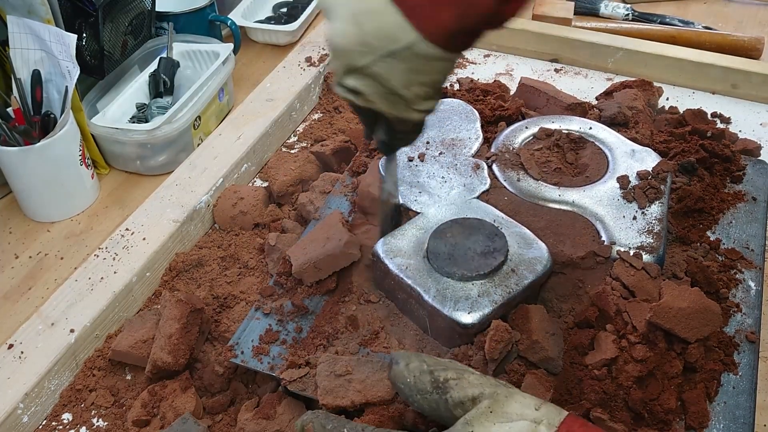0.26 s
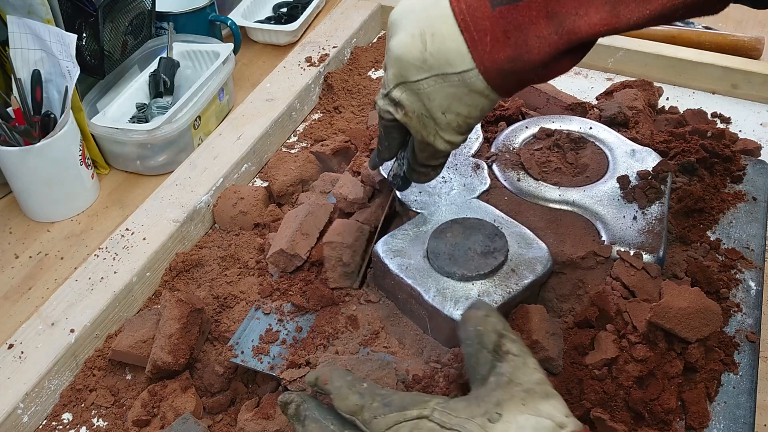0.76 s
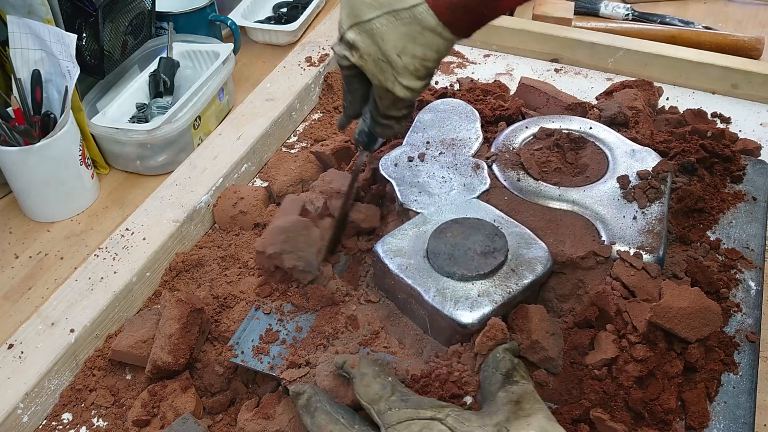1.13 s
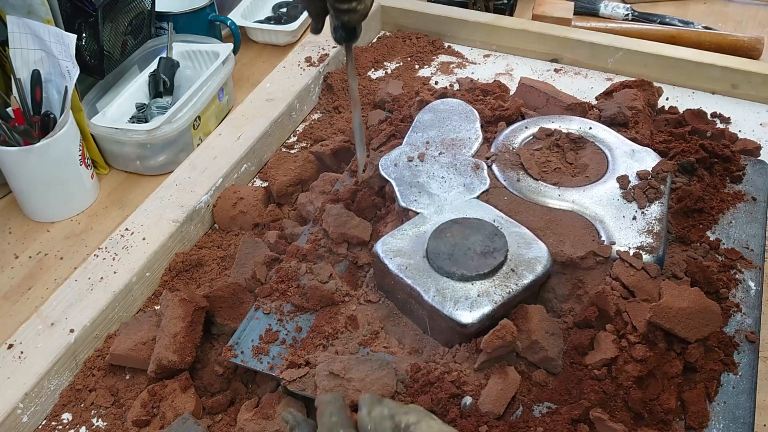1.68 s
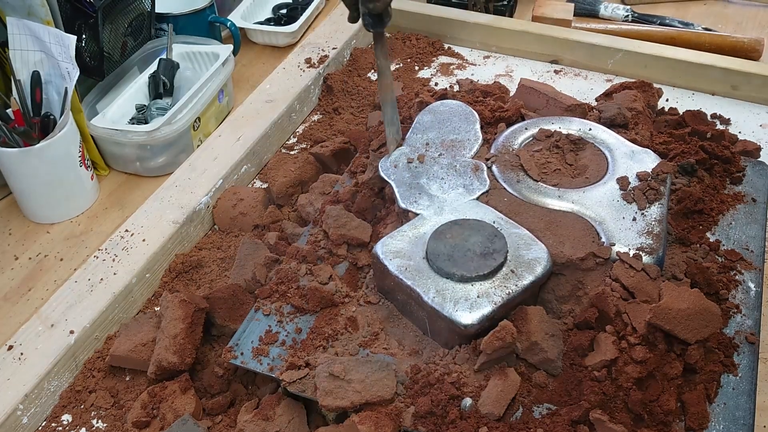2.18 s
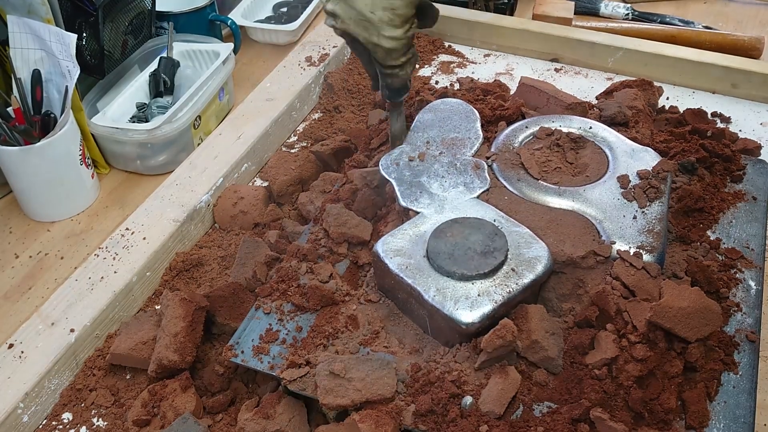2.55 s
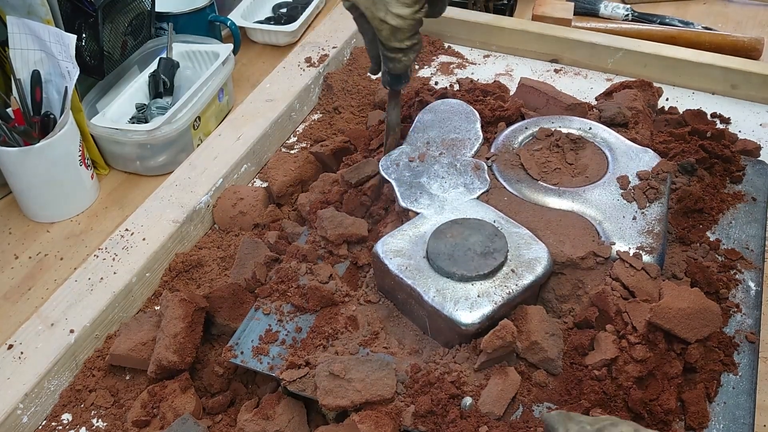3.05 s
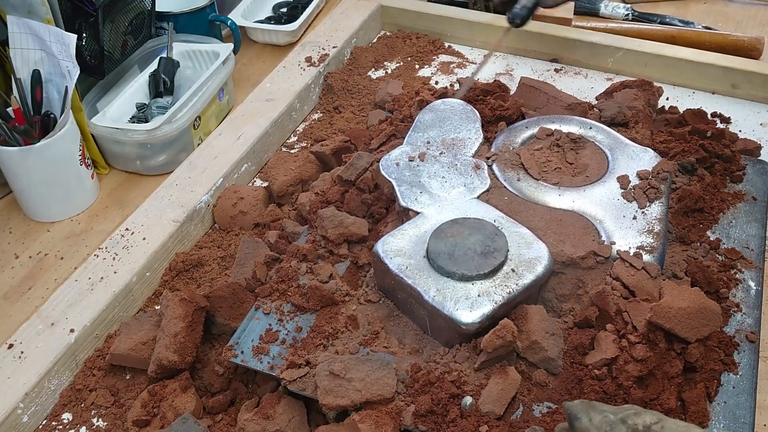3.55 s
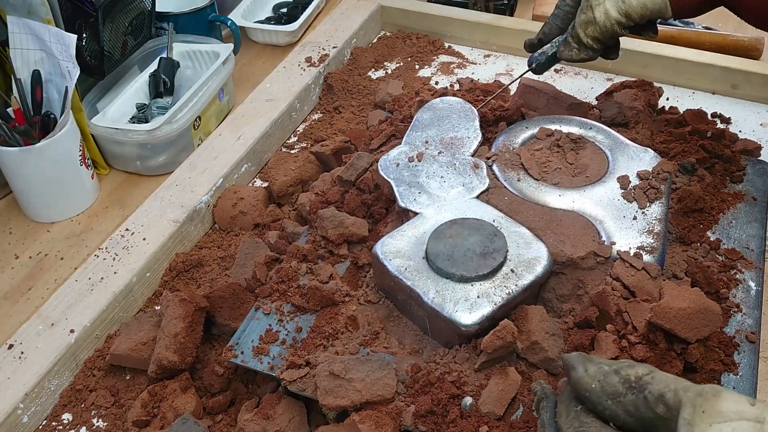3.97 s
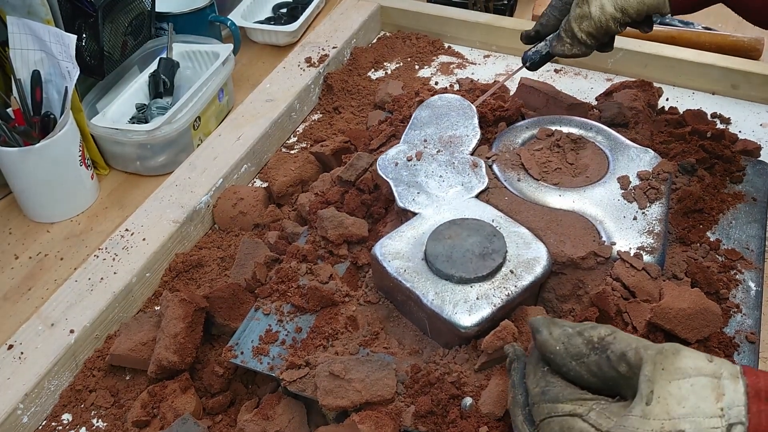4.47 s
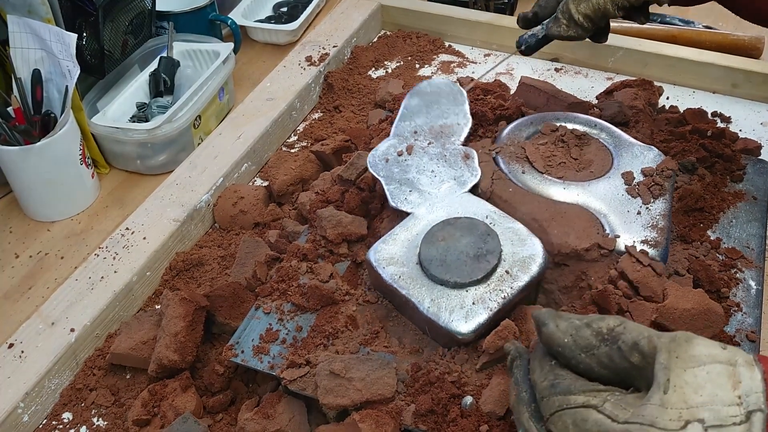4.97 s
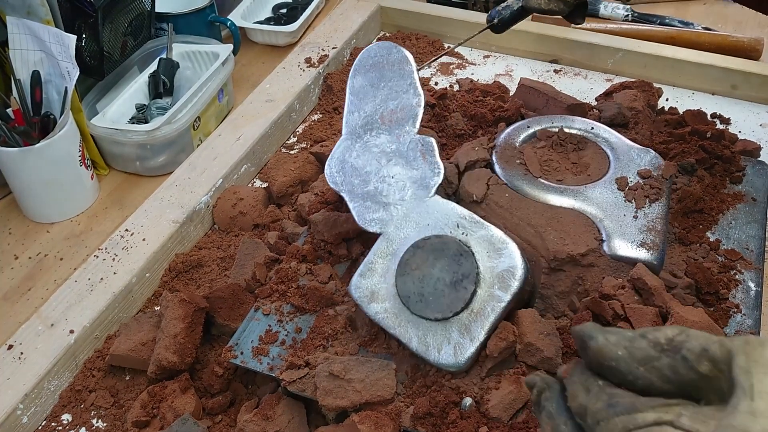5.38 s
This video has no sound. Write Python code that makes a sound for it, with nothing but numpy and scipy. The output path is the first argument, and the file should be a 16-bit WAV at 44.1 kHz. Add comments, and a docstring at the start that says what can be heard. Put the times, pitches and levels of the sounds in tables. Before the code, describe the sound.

Gritty digging in dry moulding sand with sharp metallic clinks, one brief high squeal and dull clod thumps, close up over a faint indoor hum.

```python
"""A steel blade digs through packed sand around metal castings in a wooden frame, in a quiet workshop.
Bursts of sand grains make the scrapes and drive decaying metal modes; noise cracks start the clinks.
One sagging sine squeals, then the freed blade rings. Clods are falling sine thumps with puffs of noise;
creaks and whistles are gliding sines. The bench shakes the stand under the left microphone, as resonant
noise, and behind it lie a short room tail, filtered hush and a wavering hum."""
import sys
import numpy as np
from scipy import signal
from scipy.io import wavfile
from scipy.ndimage import uniform_filter1d

SR = 44100
rng = np.random.default_rng(int(sys.argv[2]) if len(sys.argv) > 2 else 0)


def volts_from_db(level):
    """Convert decibel levels to linear amplitude ratios."""
    exponent = np.asarray(level, float) / 20
    return 10 ** exponent


def transcribe(u):
    """Save the signal u as a 16-bit wav file named by the first command-line argument.

    u: samples, shape (n,) or (channels, n), limited to [-1, 1]; the rate is SR.
    q: integer samples, one column per channel.
    """
    v = np.clip(np.atleast_2d(u).T, -1, 1)
    q = np.round(v * 32767).astype(np.int16)
    wavfile.write(sys.argv[1], SR, q)


N = 247842  # length in samples


def read(points, hz):
    """Reads a curve of (Hz, value) points, interpolated along log frequency."""
    f, value = np.transpose(points)
    return np.interp(np.log(hz + 1), np.log(f + 1), value)


def evened(x):
    """Scales to an rms of one."""
    return x / np.sqrt(np.mean(np.square(x)) + 1e-20)


def add(mix, s, sound):
    """Lays a sound into the mix at s seconds, cut off at the end."""
    part = mix[..., round(s * SR):][..., :sound.shape[-1]]
    part += sound[..., :part.shape[-1]]


def follow(rows):
    """Draws the columns of a timed curve at every sample."""
    s, *columns = np.transpose(rows)
    return [np.interp(np.arange(N) / SR, s, c) for c in columns]


def colour(x, points):
    """Causal minimum-phase filter with the given (Hz, dB) gains."""
    log_gain = np.log(volts_from_db(read(points, abs(np.fft.fftfreq(4096, 1 / SR)))))
    taps = np.fft.ifft(np.exp(np.conj(signal.hilbert(log_gain)))).real[:2048]
    return signal.oaconvolve(x, taps)[:len(x)]


def resonate(x, hz, width):
    """One-pole complex resonator: a decaying vibration at hz, width in Hz."""
    r = np.exp(-np.pi * width / SR)
    return 2 * signal.lfilter([1 - r], [1, -r * np.exp(2j * np.pi * hz / SR)], x).real


# Modes of the free blade. Each row: pitch in Hz, relative level in dB, t60 in s before the ring time factor.
BLADE_MODES = [(1110, -22, .06), (2045, -19, .2), (2400, -13, .06), (3070, -3, .165), (3930, -14, .06),
               (4330, -5, .08), (5290, -2, .09), (5690, -4, .09), (6160, -5, .07), (9935, 2, .06),
               (11560, 1, .06), (12060, -7, .06), (14400, -5, .07), (15490, -5, .07)]
# Modes of a casting. Each row: pitch in Hz, relative level in dB, t60 in s before the ring time factor.
CASTING_MODES = [(2050, -12, .18), (3080, -9, .15), (3500, -8, .1), (3680, -4, .11), (4330, -10, .08),
                 (4815, -6, .11), (5180, -4, .05), (6150, -2, .1), (7580, -2, .04), (9400, 2, .05),
                 (11460, 2, .06), (13250, -7, .07), (15260, -1, .09)]
# Modes of the blade wedged under the metal. Each row: pitch in Hz, relative level in dB, t60 in s likewise.
WEDGED_MODES = [(850, -16, .05), (1690, -16, .03), (2760, -3, .07), (3300, -14, .08), (4310, -5, .03),
                (5240, -4, .06), (5420, -2, .06), (5780, 0, .05), (6440, -6, .06), (10100, 3, .025),
                (11650, 0, .025), (13100, 0, .04), (14200, 1, .04), (15350, -3, .05)]
# Modes of the second casting, touched lightly. Each row: pitch in Hz, relative level in dB, t60 in s likewise.
PLATE_MODES = [(2160, -12, .08), (3647, -10, 0.074), (4410, 0.1, 0.24), (4720, -4, 0.0304),
               (5840, -12, 0.067), (10400, -5, 0.033)]


def ring(metal, favoured_hz, slope_db, factor, focus_db, damping_db_per_s=0):
    """Where metal is touched favours modes near one pitch; each side hears a mode at another phase."""
    modes = {"blade": BLADE_MODES, "casting": CASTING_MODES, "wedged": WEDGED_MODES, "plate": PLATE_MODES}[metal]
    hz, db, t60 = np.transpose(modes)[:, :, None]
    t = np.arange(SR // 3) / SR
    luck = rng.standard_normal((len(modes), 2))  # columns: level, phase
    octaves = np.log2(hz / favoured_hz)
    place_db = focus_db * (np.exp(-octaves ** 2 / .06) - 1) + slope_db * octaves
    decay_db = -60 * t / (factor * t60) - damping_db_per_s * t
    level = volts_from_db(db + place_db + 0.81 * luck[:, :1] + decay_db)
    level = level * np.minimum(t / 0.00048, 1)  # soft start
    turn = 2 * np.pi * hz * t
    return np.array([(level * np.sin(turn + 0.76 * side * luck[:, 1:])).sum(0) for side in (-1, 1)])


GRAINS_PER_S = 4000


def grains(count):
    """Sand grains bursting, uneven in size: one shared train and one for each side."""
    size = volts_from_db(4 * np.minimum(rng.exponential(1, (3, count)), 5))
    size = size * (rng.random((3, count)) < GRAINS_PER_S / SR)
    return evened(size * rng.choice([-1., 1.], (3, count)))


def rubbed(drive, body):
    """Every grain strikes the body a little."""
    return signal.oaconvolve(drive[None], body / np.linalg.norm(body[0]), axes=1)


# The blade's strokes. Each row: start in seconds, length in seconds, relative level in dB,
# ring against grit in dB, brightness in dB per octave, what rings.
STROKE_ROWS = [(0.045, 0.02, -39, 4.5, -1, "blade"), (0.148, 0.06, -44.5, 3.5, 1, "blade"),
               (0.21, 0.057, -43, 3.5, 1.5, "blade"), (.355, 0.096, -32, -2, 0.5, "blade"),
               (1.164, 0.03, -42.5, 3, 4.5, "wedged"), (1.329, 0.053, -45.5, -18, -7.5, "casting"),
               (1.549, 0.037, -49, -6, -1, "casting"), (2.533, 0.068, -38, -7.5, 2.5, "blade"),
               (3.079, 0.088, -64, -0.5, 0.5, "casting"), (3.231, 0.044, -41.5, -3.5, 0.7, "casting"),
               (3.397, 0.13, -57, 1.1, -2.5, "blade"), (3.457, 0.033, -51, 5.5, 1, "casting"),
               (3.679, 0.052, -56.5, 5.5, 1.5, "casting"), (3.798, 0.1, -54, -6.5, -6, "blade"),
               (4.149, 0.079, -62.5, 6.5, -1, "wedged"), (4.3, 0.053, -69.5, 4.5, -3, "wedged"),
               (4.682, 0.06, -76, 1.5, 1.1, "wedged"), (4.752, 0.082, -60.5, 5.6, -0.2, "wedged"),
               (4.872, 0.08, -63.5, 8.5, -0.1, "wedged"), (5.061, 0.27, -54.5, -22, -7.5, "blade"),
               (5.175, 0.079, -40, -7, -6, "blade"), (5.215, 0.075, -43, -9.5, -3, "blade"),
               (5.506, 0.16, -66, 1.5, 0.1, "blade")]
# Basic colour of sand grains. Each row: frequency in Hz, gain in dB.
GRIT_COLOUR = [(88, -31.5), (150, -4.5), (1870, -21), (3100, -17.5), (4000, -15), (5460, -13), (7920, -12),
               (11700, -12), (16000, -9)]
# For each metal: the rise as a share of the stroke length.
STROKE_RISE = {"blade": .1, "casting": .35, "wedged": 0.29}
# For each metal: the pitch in Hz near which modes answer a stroke most.
STROKE_PITCH_HZ = {"blade": 4500, "casting": 4900, "wedged": 5250}
BURIED_DB_PER_S = 250  # sand damps the metal during a stroke


def strokes():
    """Quick, lumpy bursts of grains; the grit is heard and drives the metal."""
    out, t = np.zeros((2, N)), np.arange(SR // 2) / SR
    for s, length, db, ring_db, slope_db, metal in STROKE_ROWS:
        lumps = volts_from_db(2.8 * evened(uniform_filter1d(rng.standard_normal(len(t)), 400)))
        rise = np.minimum(t / (STROKE_RISE[metal] * length), 1)
        fall = np.exp(-np.maximum(t - length + 0.017, 0) / (0.0037 + .12 * length))
        shared, *own = volts_from_db(db) * lumps * rise * fall * grains(len(t))
        tilt = []
        for hz, gain_db in GRIT_COLOUR:
            bright_db = slope_db * np.log2(max(hz, 1500) / 4000)
            low_cut_db = 6 * max(np.log2(700 / hz), 0)
            tilt.append((hz, gain_db + 10 + bright_db - low_cut_db))
        add(out, s, np.array([colour(shared + 1.4 * g, tilt) for g in own]))
        body = ring(metal, STROKE_PITCH_HZ[metal], slope_db, 1.0, 3.6, BURIED_DB_PER_S)
        add(out, s, volts_from_db(ring_db) * rubbed(shared, body))
    return out


# Blows on metal. Each row: start in seconds, relative crack level in dB, ring against crack in dB,
# favoured pitch in Hz, ring time factor, what rings.
BLOW_ROWS = [(0.017, -42.5, 7, 4850, 0.71, "casting"), (0.0459, -28.5, -12, 4070, 1, "blade"),
             (0.5014, -44.5, 9.5, 4330, 0.091, "plate"), (1.169, -36, -1.5, 4300, 0.5, "wedged"),
             (1.1864, -23, -4.5, 5940, 0.47, "wedged"), (1.2043, -25.5, -1.2, 4270, 0.6, "wedged"),
             (1.541, -37, 2, 6800, 1.04, "casting"), (2.1887, -17, 11, 2190, 0.25, "blade"),
             (2.191, -60, 14.5, 4400, 1.3, "plate"), (2.248, -50, 11, 4410, 0.11, "plate"),
             (2.302, -51, 7.5, 4410, 0.09, "plate"), (2.3511, -57, 1.5, 3630, 0.61, "casting"),
             (2.5192, -17.5, -0.7, 5600, 0.72, "blade"), (2.7087, -32.5, 0, 3070, 0.11, "blade"),
             (2.744, -39.5, -20, 3070, .4, "blade"), (3.037, -54, -7, 3070, 1.34, "blade"),
             (3.3539, -15.5, -3.5, 11900, 0.76, "casting"), (3.468, -40, 4.5, 3300, 0.99, "casting"),
             (3.623, -39.5, 0.3, 3000, 1, "casting"), (3.68, -48.5, 2, 4850, .8, "casting"),
             (3.7897, -8, -3.5, 3070, 0.22, "blade"), (3.81, -64, 15, 4430, 1.08, "plate"),
             (5.1528, -22, 2.5, 3080, 0.11, "blade"), (5.156, -32.5, 5, 5650, 1.36, "blade"),
             (5.2139, -23, 9, 3100, 1.2, "blade"), (5.224, -16, -7.5, 4330, .3, "blade"),
             (5.297, -42, 3, 4500, 0.092, "plate")]
# For each metal: how strongly a blow singles out the favoured modes, in dB.
BLOW_FOCUS_DB = {"blade": 12, "casting": 8.5, "wedged": 5, "plate": 5}
# For each metal: starting tilt of crack and ring in dB per octave, before force and place are added.
BLOW_TILT = {"blade": 0.1, "casting": -1.5, "wedged": 2.3, "plate": -1.1}
# Harder blows are brighter, blows that mostly ring are duller (dB per octave per dB).
SOFT_BLOW_DB, HARDENING, RING_DULLING = -34, .07, .22
HIGH_TOUCH = 1.8  # dB per octave for each octave that the favoured pitch lies above 4 kHz


def blows():
    """A crack of a few milliseconds, a spray of sand, and the metal ringing."""
    out, t = np.zeros((2, N)), np.arange(SR // 4) / SR
    crack, spray = np.exp(-t / 0.0062), volts_from_db(-14.5) * np.exp(-t / 0.024)
    burst = np.minimum(t / .001, 1) * (crack + spray)
    for s, db, ring_db, hz, factor, metal in BLOW_ROWS:
        force_db = HARDENING * (db - SOFT_BLOW_DB) - RING_DULLING * ring_db
        slope_db = BLOW_TILT[metal] + force_db + HIGH_TOUCH * np.log2(hz / 4000)
        shared, *own = rng.standard_normal((3, len(t))) * burst
        tilt = [(200, -20.5), (1000, -2 * slope_db), (16000, 2 * slope_db)]
        add(out, s, volts_from_db(db - 10.5) * np.array([colour(shared + 0.33 * n, tilt) for n in own]))
        add(out, s, volts_from_db(db + ring_db) * ring(metal, hz, slope_db, factor, BLOW_FOCUS_DB[metal]))
    return out


# The edge catches on metal and squeals. Each row: time in seconds, bite in dB.
BITE_CURVE = [(2.519, -41.5), (2.532, -23.5), (2.544, -22.5), (2.556, -9.5), (2.568, -7.5), (2.579, -8.5),
              (2.587, -30.5)]
SQUEAL_HZ, SAG_HZ, SQUEAL_LEFT_DB = 9980, 42, -10  # pitch sags as it bites; left is weaker than right
LET_GO_HZ, LET_GO_DB, LET_GO_T60_S = 9942, -24, .13  # the freed blade rings out


def squeal():
    """One slipping tone that the two ports hear far out of step; then the blade lets go and rings out."""
    bite_db, = follow(BITE_CURVE)
    t = np.arange(N) / SR
    start, end = BITE_CURVE[0][0], BITE_CURVE[-1][0]
    turn = 2 * np.pi * np.cumsum(SQUEAL_HZ - SAG_HZ * volts_from_db(bite_db - bite_db.max())) / SR
    biting = volts_from_db(bite_db) * ((t > start) & (t < end))
    after = np.maximum(t - end, 0)
    free_level = volts_from_db(LET_GO_DB - 60 * after / LET_GO_T60_S) * np.minimum(after / .006, 1)
    free = free_level * np.sin(2 * np.pi * LET_GO_HZ * t)
    return biting * np.array([volts_from_db(SQUEAL_LEFT_DB) * np.sin(turn + 2.5), np.sin(turn)]) + free


# How much loose sand is crumbling. Each row: time in seconds, relative level in dB.
CRUMBLE_CURVE = [(0, -54), (.32, -52), (.47, -41), (.65, -45.5), (.8, -52.5), (.97, -59), (1.12, -52),
                 (1.3, -52.5), (1.4, -47), (1.58, -51), (1.7, -62), (1.9, -59), (2.1, -73), (2.5, -73.5),
                 (2.65, -54), (2.9, -67.5), (3.2, -70), (3.55, -69), (4.5, -65), (4.7, -68.5), (5.05, -57),
                 (5.3, -55.5), (5.42, -60), (5.62, -46.5)]
QUIET_SAND_DB, BRIGHT_DB, DULLING = -70, 0.28, 0.26  # more sand is duller
BURIED_RING_DB, RING_GROWTH = -80, .3  # the buried blade rings only a little more with more sand
WEDGED_FROM_S = 4.0  # the blade is pushed under the casting


def crumble():
    """A dull bed of grains that touches the buried blade."""
    sand_db, = follow(CRUMBLE_CURVE)
    more_db = sand_db - QUIET_SAND_DB
    bright_db = BRIGHT_DB - DULLING * more_db
    shared, *own = grains(N)
    spread = evened([colour(shared + 1.6 * g, GRIT_COLOUR) for g in own])
    low = signal.lfilter(*signal.butter(N=2, Wn=3000, fs=SR), spread)
    sand = volts_from_db(sand_db) * (volts_from_db(-bright_db) * low + volts_from_db(bright_db) * (spread - low))
    touch = volts_from_db(BURIED_RING_DB + RING_GROWTH * more_db) * shared
    wedged = np.arange(N) > WEDGED_FROM_S * SR
    free_ring = rubbed(touch * ~wedged, ring("blade", 4330, -2.1, .6, 3.0))
    wedged_ring = rubbed(touch * wedged, ring("wedged", 2760, -2.1, .9, 3.93))
    return sand + (volts_from_db(-2.5) * free_ring + volts_from_db(3) * wedged_ring)[:, :N]


# Clods landing on the tray. Each row: start in seconds, relative level in dB,
# pitch in Hz that the thump falls to, t60 in seconds.
CLOD_ROWS = [(.482, -28, 153, 0.028), (.615, -41.5, 235, 0.063), (1.354, -23, 242.6, 0.047),
             (1.357, -32.5, 847, 0.029), (1.43, -33.5, 465, 0.061), (1.766, -44, 199, 0.043),
             (2.189, -30, 443, 0.066), (2.2, -36, 269, 0.0892), (3.369, -49.5, 110, .1),
             (3.792, -42.5, 480, 0.054), (5.25, -31.5, 115, 0.079), (5.6, -37, 110, 0.07)]


def clods():
    """A dull falling thump with a puff of loose sand."""
    out, t = np.zeros(N), np.arange(SR // 4) / SR
    for s, db, hz, t60 in CLOD_ROWS:
        thump = np.sin(2 * np.pi * np.cumsum(hz * (1 + 0.68 * np.exp(-t / 0.003))) / SR)
        noise = rng.standard_normal(len(t))
        puff = evened(resonate(resonate(noise, 1.3 * hz, 900), 2.0 * hz, 1500))
        add(out, s, volts_from_db(db - 60 * t / t60) * (thump + .5 * puff) * np.minimum(t / 0.0022, 1))
    return out * volts_from_db([[-1], [1]])  # a little to the right


TONE_ENDS_DB = -12  # against the middle of a tone


def tones(rows, waver):
    """Wavering near-sines that glide, swell and fade."""
    out = np.zeros(N)
    for s, length, db, from_hz, to_hz in rows:
        u = np.arange(0, length, 1 / SR) / length
        wobble = evened(uniform_filter1d(rng.standard_normal(len(u)), 300))
        hz = (from_hz + (to_hz - from_hz) * u) * (1 + waver * wobble)
        swell = volts_from_db(db + TONE_ENDS_DB * (2 * u - 1) ** 2) * signal.windows.tukey(len(u), .3)
        add(out, s, np.sqrt(2) * swell * np.sin(2 * np.pi * np.cumsum(hz) / SR))
    return out


# Short rubbing tones. Each row: start in seconds, length in seconds, relative level in dB,
# first pitch in Hz, last pitch in Hz.
CREAK_ROWS = [(.485, 0.068, -43, 820, 700), (2.53, .1, -56.5, 872, 868)]


def creaks():
    """Short rubbing tones, as gliding sines with a slight waver."""
    return tones(CREAK_ROWS, .01)


# Faint thin whistles. Each row: start in seconds, length in seconds, relative level in dB,
# first pitch in Hz, last pitch in Hz.
WHISTLE_ROWS = [(.67, .19, -71, 4900, 5140), (4.455, .135, -75, 5030, 5070)]


def whistles():
    """Faint thin rising sines with a little more waver."""
    return tones(WHISTLE_ROWS, .013)


# Sparse short room. Each row: frequency in Hz, t60 in seconds.
ROOM_DECAY = [(250, 0.48), (1000, 0.12), (4000, 0.14), (12000, 0.085)]


def room(x):
    """Sparse taps of random sign, each band dying at its own speed."""
    taps = np.zeros((2, SR // 2))
    slots = np.arange(200, SR // 2 - 20, 20)
    at = slots + rng.integers(0, 20, (2, len(slots)))
    np.put_along_axis(taps, at, rng.choice([-1., 1.], at.shape), 1)
    hz, t, z = signal.stft(taps, SR, nperseg=256)
    decay = volts_from_db(-60 * t / read(ROOM_DECAY, hz)[:, None])
    tail = signal.istft(z * decay, SR, nperseg=256)[1]
    return signal.fftconvolve(x, tail / np.linalg.norm(tail[0]), axes=1)[:, :N]


SMOOTH_S = 0.024


def swells(s, db, fade_s, rise_db_per_s):
    """Each push builds up at one rate and fades at its own; their powers add."""
    t = np.arange(0, N + 64, 64) / SR - np.array(s)[:, None]
    change_db = np.where(t < 0, rise_db_per_s * t, -20 * t / np.array(fade_s)[:, None])
    level = volts_from_db(np.array(db)[:, None] + change_db)
    sharp = np.interp(np.arange(N), 64 * np.arange(t.shape[1]), np.sqrt((level ** 2).sum(0)))
    width = round(SMOOTH_S * SR)
    return uniform_filter1d(uniform_filter1d(sharp, width), width)


# Pushes on the bench. Each row: time in seconds, relative sway in dB, relative bounce in dB,
# time to fade 20 dB in seconds (zero stops at once, a negative time keeps growing).
JOLT_ROWS = [(0.139, -35, -29, 0.5), (0.279, -20.5, -29, 0.17), (.44, -20, -22, 0.11), (.5, -13, -22, 0.06),
             (.62, -28.5, -24, 0.09), (.75, -33.5, -39, 0.56), (1.13, -38.5, -60, 0.16),
             (1.36, -38, -33.5, 0.62), (1.45, -33, -27.5, 0.4), (1.85, -38.5, -35, 0.2),
             (2.242, -26, -28.5, 0.17), (2.309, -24, -37, 0.24), (2.64, -34, -25, 0.18),
             (2.77, -30.5, -41, 0.17), (2.83, -42, -35, .3), (3.1, -43, -34, 0.6),
             (3.85, -55.5, -35.5, 0.5), (3.94, -40, -37, 0.3), (4.27, -34, -28.5, 0.57),
             (4.38, -25, -28, 0.26), (4.55, -40, -34, 0.3), (4.82, -43, -23.5, 0.32),
             (4.9, -20.5, -27.5, 0.18), (4.978, -33, -25, 0), (5.04, -30.5, -47, 0.14),
             (5.13, -34.5, -24.5, 0.02), (5.231, -19.5, -37, 0.2), (5.271, -20, -16.5, 0.17),
             (5.62, -27, -24.5, -2)]
# Sway, bounce, rumble and buzz of the stand. Each row: pitch in Hz, width of the first resonator in Hz.
STAND_MODES = [(20, 7.7), (37, 3.08), (62, 34), (210, 8.6)]
JOLT_RISE_DB_PER_S, RUMBLE_DB, BUZZ_DB = 259.5, -29, -36  # rumble and buzz against bounce
# Landing clods make the stand rumble too, big low ones most.
CLOD_RUMBLE_DB, CLOD_RUMBLE_FADE_S, CLOD_RISE_DB_PER_S, BIG_CLOD_DB_PER_OCTAVE = -4.5, 0.14, 900, 10.5
RUMBLE_FROM_HZ, STAND_TOP_HZ = 50, 75  # modes below the first (sway, bounce) thin out above the second


def shake():
    """The stand sways, bounces, rumbles and buzzes; the left microphone takes nearly all of it."""
    s, sway_db, bounce_db, fade_s = np.transpose(JOLT_ROWS)
    sway = swells(s, sway_db, fade_s, JOLT_RISE_DB_PER_S)
    bounce = swells(s, bounce_db, fade_s, JOLT_RISE_DB_PER_S)
    landing, clod_db, clod_hz = np.transpose(CLOD_ROWS)[:3]
    clod_db = clod_db + CLOD_RUMBLE_DB - BIG_CLOD_DB_PER_OCTAVE * np.log2(clod_hz / 150)
    clod_fade_s = np.full(len(landing), CLOD_RUMBLE_FADE_S)
    rumble = volts_from_db(RUMBLE_DB) * bounce + swells(landing, clod_db, clod_fade_s, CLOD_RISE_DB_PER_S)
    thin = signal.butter(N=1, Wn=STAND_TOP_HZ, fs=SR, output="sos")
    noise, out = rng.standard_normal((2, N)), 0
    for (hz, width), strength in zip(STAND_MODES, (sway, bounce, rumble, volts_from_db(BUZZ_DB) * bounce)):
        motion = resonate(resonate(noise, hz, width), hz, 2.4 * width)
        # evened over time, so that the pushes alone set the strength
        motion /= np.sqrt(abs(uniform_filter1d(motion ** 2, SR // 8)) + 1e-20)
        motion *= strength
        if hz < RUMBLE_FROM_HZ:
            motion = signal.sosfiltfilt(thin, motion)
        out = out + motion
    return np.array([volts_from_db(1.5) * out[0], volts_from_db(-22) * (out[1] - 0.47 * out[0])])


# Colour of the workshop hush. Each row: frequency in Hz, relative gain in dB.
AIR_COLOUR = [(29, -15), (50, 4), (167, -56), (321, -34), (495, -20), (646, -33), (863, -24), (2110, -36.5),
              (3500, -31.5), (6240, -60), (8140, -73.5), (13500, -47), (16000, -48.5)]
AIR_DB = -55.5 - 3.5
HUM_HZ, HUM_DB = 495.4, -74.5


def air():
    """Workshop hush, unlike on the two sides, and a wavering hum of narrow noise."""
    hush = evened([colour(n, AIR_COLOUR) for n in rng.standard_normal((2, N))])
    hum = evened(resonate(rng.standard_normal(N), HUM_HZ, 7.4))
    return volts_from_db(AIR_DB) * hush + volts_from_db(HUM_DB) * hum


# Response of both microphone ports. Each row: frequency in Hz, gain in dB.
MIC_RESPONSE = [(100, -12.5), (5000, -0.5), (6500, 3), (7300, -20), (8300, -23.5), (9300, -9), (11000, -13),
                (15500, -8), (16200, -30.5), (17000, -61)]
# Left port against the right. Each row: frequency in Hz, gain in dB.
LEFT_RESPONSE = [(100, -0.5), (4300, 1), (5500, -17.5), (6500, -24.5), (7300, 10), (8000, -8), (8900, -25),
                 (10500, -6), (12000, 3), (15500, -5)]


def ports(sound):
    """Each port of the housing has its own dips; the left side is shifted two samples earlier."""
    left, right = sound
    early = np.roll(left, shift=-2)
    return np.array([colour(colour(early, LEFT_RESPONSE), MIC_RESPONSE), colour(right, MIC_RESPONSE)])


def scene():
    """Digging through the ports, the squeal, their room tails, the shaken stand and the air."""
    near = strokes() + blows() + crumble() + clods() + creaks() + whistles()
    bench = volts_from_db(5.5) * (near + volts_from_db(-11.0) * room(near))
    squealing = squeal()
    return ports(bench) + squealing + volts_from_db(-9.0) * room(squealing) + shake() + air()


def roll_off(x):
    """The treble ends steeply here."""
    return signal.sosfilt(signal.butter(12, 16820, fs=SR, output="sos"), x)


def record(dry):
    """Turns the finished mix into its stored form, with the top cut off."""
    return roll_off(dry)


dry = scene()
out = record(dry)
transcribe(out)
```